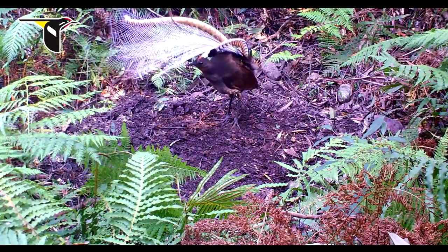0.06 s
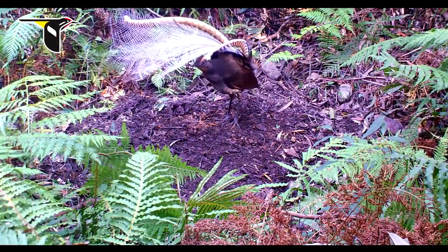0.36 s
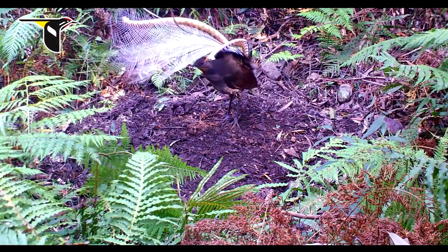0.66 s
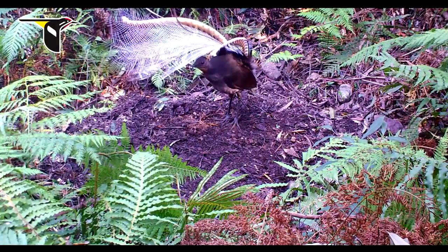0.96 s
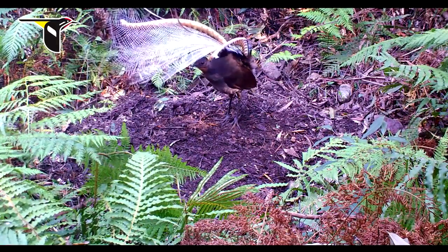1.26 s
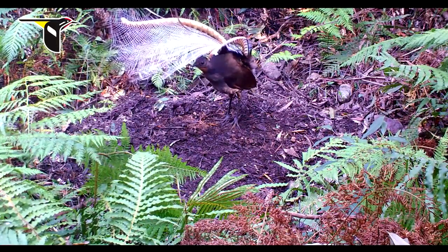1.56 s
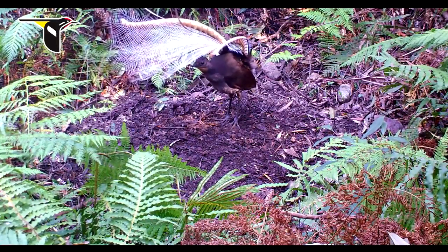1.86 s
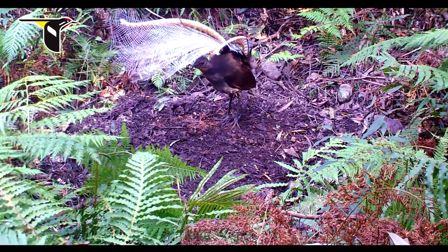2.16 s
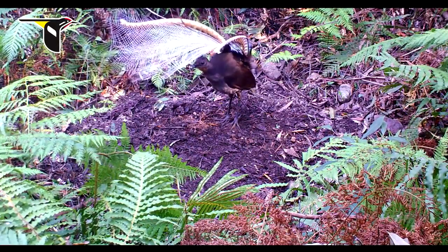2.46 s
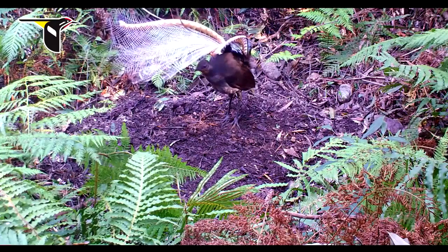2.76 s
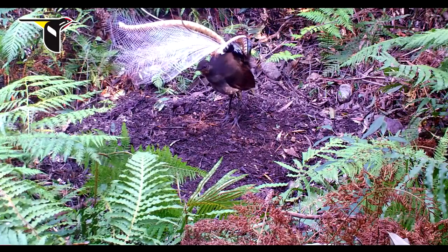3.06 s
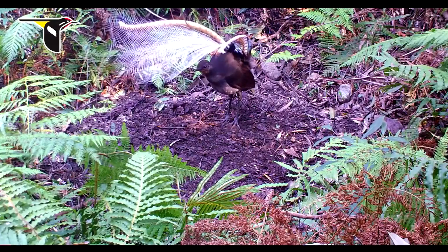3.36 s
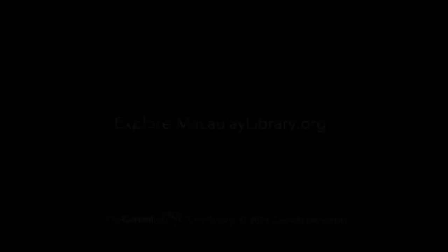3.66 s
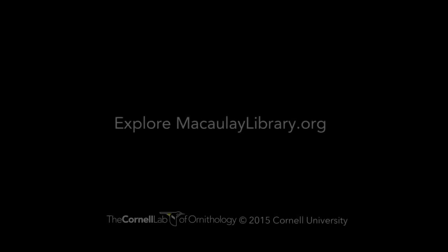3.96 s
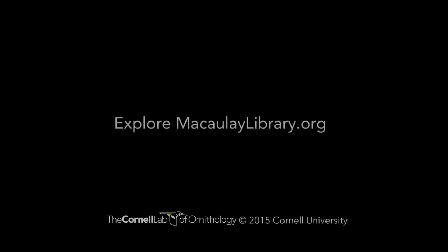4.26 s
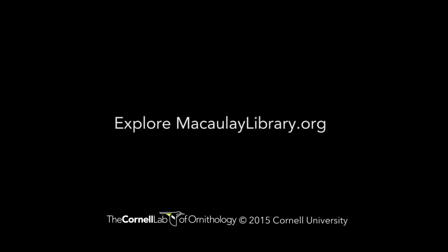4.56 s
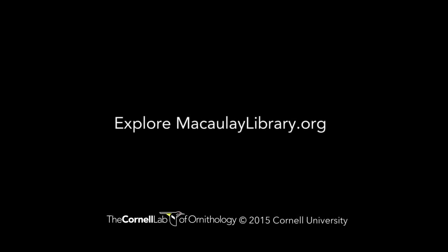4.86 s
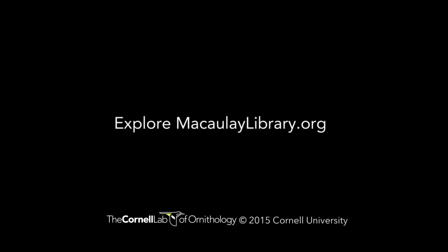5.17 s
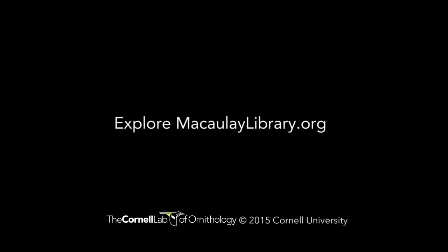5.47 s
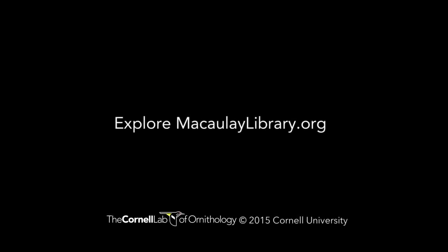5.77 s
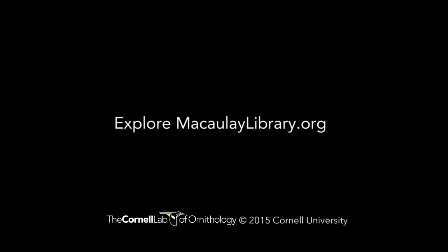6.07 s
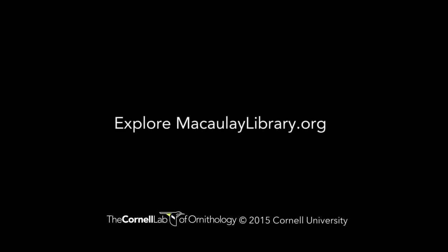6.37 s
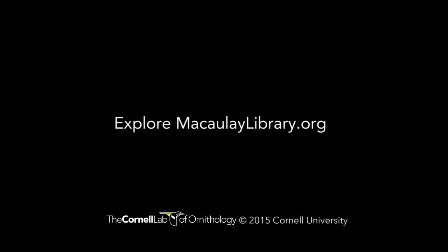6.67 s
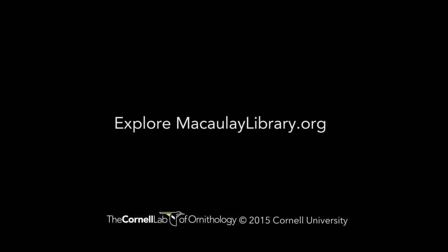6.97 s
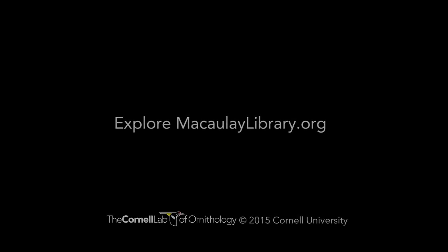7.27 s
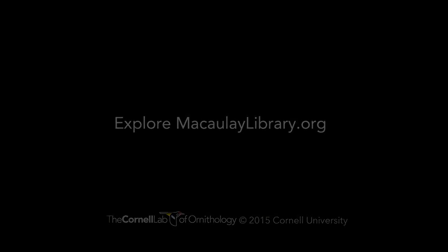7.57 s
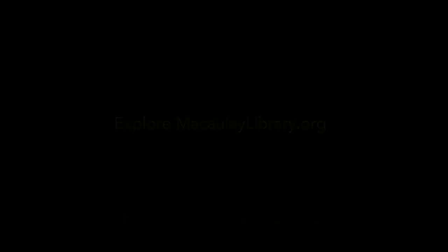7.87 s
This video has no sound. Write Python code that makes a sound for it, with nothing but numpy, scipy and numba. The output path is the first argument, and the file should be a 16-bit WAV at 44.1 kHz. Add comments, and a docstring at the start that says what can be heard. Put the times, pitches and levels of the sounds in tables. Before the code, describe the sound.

Over a faint insect buzz, a forest bird clicks and rasps rapidly, ending with two short squawks that each drop into a whistle.

```python
"""A lyrebird displays in a fern forest: short rattling chips, a train of longer rasps, then two harsh
squawks that each fall into a whistle. Its voice is a source and a filter: a membrane snaps unevenly
or locks into periodic vibration, and the resonances of the throat shape the spectrum.
Leaf litter crackles under its feet, insects buzz high over a low rumble of air,
and the ground and trunks return a thin echo."""
import sys
import numpy as np
from scipy import signal
from scipy.fft import rfft, irfft
from scipy.io import wavfile
from scipy.ndimage import uniform_filter1d
from numba import njit

SR = 44100
rng = np.random.default_rng(int(sys.argv[2]) if len(sys.argv) > 2 else 0)


def dump_mix(stems):
    """Bounce the given channels to the path in sys.argv[1] as a 16-bit WAV at rate SR."""
    frames = np.atleast_2d(stems).T  # one column per channel
    limited = np.clip(frames, -1, 1)  # hard clip at full scale
    pcm = np.round(limited * 32767).astype(np.int16)
    wavfile.write(sys.argv[1], SR, pcm)


N = 349272
T = np.arange(N) / SR

# chips: start t/s, peak t/s, 20 dB fall t/s, ring f/Hz, voicing (used from 0.25 up), relative level/dB
CHIPS = [(2.24, 2.265, .014, 4320, 0.1, -35), (2.345, 2.368, 0.017, 4720, 0, -36.5),
         (2.465, 2.488, 0.022, 4480, 0.39, -37), (2.59, 2.617, .014, 4540, 0.1, -33.5),
         (2.734, 2.755, .026, 4650, 0.1, -38.5), (3.323, 3.348, 0.026, 4210, 0.41, -38),
         (3.462, 3.486, 0.038, 4140, 0.43, -37), (3.601, 3.631, 0.039, 4050, .35, -38),
         (3.742, 3.774, 0.039, 4130, 0.36, -38.5), (4.315, 4.336, 0.017, 4500, 0.43, -31.5)]
# rasps: start t/s, end t/s, mid-sweep resonance f/Hz, relative level/dB, crescendo/dB
RASPS = [(3.517, 3.559, 4600, -56, -2), (3.662, 3.7, 4690, -52.5, 5), (3.808, 3.875, 4830, -44.5, 0),
         (3.929, 4.017, 4750, -44, 8.5), (4.085, 4.159, 4660, -42, 5), (4.23, 4.33, 4800, -43, -5),
         (4.398, 4.51, 4560, -39.5, 3.5), (4.579, 4.68, 4970, -41, 1), (4.762, 4.831, 4400, -40, 6.5),
         (4.903, 4.957, 4500, -51, -6), (4.968, 5.043, 4800, -38.5, -1), (5.111, 5.154, 4520, -54, -2),
         (5.161, 5.25, 4400, -39, 7.5), (5.299, 5.418, 4540, -39, 1.5), (5.423, 5.503, 4960, -43.5, -3),
         (5.529, 5.623, 4550, -38, 4), (5.69, 5.828, 4740, -38.5, 2), (5.88, 6.021, 4830, -41.5, 15.5),
         (6.115, 6.243, 4900, -41, 4.5), (6.346, 6.455, 5040, -42, 9.5), (6.458, 6.528, 4320, -57.5, 4)]
# side bands relative to each rasp: t/s, body level/dB, treble level/dB, sheen level/dB
RASP_BANDS = [(3.6, -21.5, -10, -13), (4.7, -18, -13.5, -23), (5.0, -21.5, -15, -21.5),
              (5.55, -22.5, -23, -25), (5.75, -48, -21, -21), (6.4, -49, -18.5, -15.5)]
# sudden pushes within the rasps: t/s, added level/dB
ACCENTS = [(4.661, 5.5), (5.004, 5.5), (5.192, 3)]
# squawks: start t/s, loudest t/s, end t/s, pitch when loudest f/Hz, level/dB
SQUAWKS = [(7.132, 7.176, 7.213, 972, -27.5), (7.307, 7.345, 7.39, 848, -37)]
# aperiodic share of a squawk's power: at its start, when loudest, at its end
SQUAWK_CHAOS = [.5, .28, .95]
# whistles: start t/s, end t/s, settled f/Hz, level/dB, decay/(dB/s), relative second harmonic level/dB
WHISTLES = [(7.196, 7.295, 1745, -21.5, 185.5, -21.5), (7.368, 7.453, 2115, -35, 77, -4)]
# upper harmonics of a whistle: harmonic number, relative level/dB
OVERTONES = [(3, -32.5), (5, -28.5), (6, -40), (7, -24.5), (8, -39)]

# pass bands of the chips and rasps: f/Hz, relative level/dB
CORE = [(2700, -27.5), (3050, -11), (3400, -10.5), (3650, -2.5), (3950, 0.5), (4400, 0), (4950, 0.5),
        (5300, -3), (5800, -3.5), (6100, -32), (6800, -45.5)]
BODY = [(450, -37), (750, 6.5), (1000, 2.5), (1250, 1.5), (1650, 6), (2300, -1), (2800, -16), (3600, 2)]  # low band of the chips, also of the litter
RASP_BODY = [(700, -19), (1150, -15), (1600, 6), (2200, 2.5), (2550, 6.5), (2850, -44), (3600, 7.5)]
TREBLE = [(5000, 2), (6200, 2), (6700, -4), (7500, 4), (7900, -12), (9200, -10.5), (12000, -32),
          (15000, -24.5)]
SHEEN = [(9300, -57), (9900, -4), (10400, 5.5), (11200, 8), (11600, -18.5), (13500, -19), (15000, -65)]
# formants of the open throat, and its crisp top band: f/Hz, relative level/dB
THROAT = [(560, -31.5), (720, -14), (880, -16.5), (1150, -16), (1750, -5.5), (2250, -2), (2570, -2),
          (2850, -18), (3250, -11), (3880, -1.5), (4350, -2.5), (4700, -16.5), (5150, -7.5), (5900, -19.5),
          (6800, -36)]
THROAT_TOP = [(6000, -21), (7700, -7), (8700, 2.5), (9700, 0), (11000, 4), (12500, -4), (15000, -10)]

# crackles underfoot: t/s, half width t/s, level/dB
CRACKLES = [(.368, 0.0053, -54), (0.527, 0.0087, -51.5), (.572, 0.024, -55.5), (.615, 0.022, -54),
            (.647, 0.0071, -37.5), (.675, .028, -57), (2.003, 0.0066, -54), (6.597, 0.018, -56),
            (6.661, 0.023, -59), (6.77, 0.095, -63.5), (7.839, 0.0039, -45)]
# spectrum of dry leaves: f/Hz, relative level/dB
LEAVES = [(2800, -25.5), (3500, -2.5), (4100, 11), (5000, 9), (6200, -4.5), (9000, -17.5), (11000, -8.5),
          (12500, -17), (15000, -21)]
# reflections from the ground and near trunks: delay t/s, level/dB relative to the direct sound
REFLECTIONS = [(.00085, -24.5), (.0037, -22.5), (.0066, -13), (0.011, -15.5)]
# envelope of the insect buzz: t/s, level/dB
BUZZ_LEVEL = [(0, -63), (.45, -64), (1.75, -62.5), (3.11, -70.5), (3.18, -83.5), (5.2, -64), (6.28, -71.5),
              (6.55, -65.5), (6.96, -65.5), (7.03, -76), (7.6, -102.5), (7.92, -62.5)]
# spectra of the insects and of still forest air: f/Hz, relative level/dB
BUZZ = [(3000, -18.5), (3600, -5.5), (4050, 4), (4700, 3.5), (5400, -1), (6200, -10.5), (7600, -17.5),
        (9300, -30.5), (11000, -16), (12500, -23.5), (15000, -34.5)]
FOREST_AIR = [(12, 1), (28, 1.5), (55, -4.5), (110, -8), (200, -14.5), (350, -20.5), (700, -28),
              (1400, -33.5), (2800, -41), (6000, -46), (10000, -48), (15000, -53)]


def chips():
    """Impulse excitation: a rattle rings the throat, whose resonance dips as an undertone arches up."""
    attack_s, body_db = .0057, -54
    notes, undertone, arches, ring, openings, crisp = [], 0, 0, 0, 0, 0
    waver = 1 + .012 * walk(500)
    for start, peak, fall, ring_hz, voicing, db in CHIPS:
        gate = ramp(T - start + attack_s / 2, attack_s)
        shape = gate * swell(peak, rise=.027, fall=fall, shape=1.65)
        envelope = undb(db) * shape
        arch = np.clip(1 - ((T - peak) / .028) ** 2, 0, 1)
        hz = ring_hz * (1 + .19 * (1 - arch ** 2))
        voicing = np.clip(voicing, .25, .9)
        noisy_db = 20 * np.log10(1 - voicing)  # voicing weakens the noise bands
        # the low body does not follow the chip's level; the upper bands do
        notes.append((envelope, hz, body_db - db + noisy_db, noisy_db - 22.5, noisy_db - 21))
        crisp += envelope * undb(noisy_db - 23.5)
        ring += envelope * voicing * np.sin(phase_of(hz * waver))
        undertone += shape * undb(body_db + .5) * np.sqrt(voicing)
        arches += arch
        # a thin, narrow-band rattle leads up to the peak
        openings += gate * ramp(peak - T, .011) * (voicing / .42) ** 2
    source, thin = (rattle(rate=800, jitter=.35, scatter_db=1.8, hiss=.6) for _ in range(2))
    hum = colour(pulses(270 + 68 * arches, rough=.008), BODY)
    thin = colour(resonance(thin, np.full(N, 4860.), width_hz=640.), CORE)
    main = undb(1.04) * (shape_notes(source, notes, sweep=.93, width_hz=1070., body=BODY) + ring)
    return main + undertone * hum + crisp * colour(source, THROAT_TOP) + undb(-44.5) * openings * thin


def rasps():
    """Modulation of a rattle: each beat of a flutter swings its level and sweeps the resonance upwards."""
    attack_s, release_s, flutter_hz = .0054, .004, 68
    band_times, *bands = np.transpose(RASP_BANDS)
    notes, crisp = [], 0
    for start, end, ring_hz, db, crescendo_db in RASPS:
        gate = np.clip(np.minimum((T - start) / attack_s, (end - T) / release_s) + .6, 0, 1)
        place = ramp(T - start, end - start) - .5
        arch_db = -6 * (2 * place) ** 2
        envelope = gate * undb(db + crescendo_db * place + arch_db)
        body_db, treble_db, sheen_db = (np.interp((start + end) / 2, band_times, b) for b in bands)
        notes.append((envelope, ring_hz, body_db, treble_db, sheen_db))
        crisp += envelope * undb(sheen_db - 11)
    beats = np.cumsum(flutter_hz * (1 + .06 * walk(25))) / SR
    depth = np.interp(T, [4.6, 5.6], [.45, 1])  # the flutter deepens along the train
    source = rattle(rate=760, jitter=.3, scatter_db=1.1, hiss=.6)
    source *= undb(1.4 * depth * np.sin(2 * np.pi * beats))
    sweep = 1 + .36 * depth * (beats % 1 - .45) + .04 * walk(90)
    accent_db = sum(db * np.exp(-((T - s) / .009) ** 2) for s, db in ACCENTS)
    main = shape_notes(source, notes, sweep, width_hz=1060., body=RASP_BODY)
    return undb(.83 + accent_db) * (main + crisp * colour(source, THROAT_TOP))


def squawk(start, loudest, end, loudest_hz, db):
    """Nonlinear vibration: a rising tone, partly broken into chaos, excites the open throat's formants."""
    start_hz, attack_s, release_s = 696, .0027, .009
    chaos = rattle(rate=1300, jitter=.35, scatter_db=1.5, hiss=.7)
    climb = np.clip((T - start) / (loudest - start), 0, 1.3)
    tone = pulses(start_hz + (loudest_hz - start_hz) * climb, rough=.024)
    stages = [start, loudest, end]
    share = np.interp(T, stages, SQUAWK_CHAOS)
    gate = ramp(T - start, attack_s) * ramp(end - T, release_s)
    envelope = gate * undb(db + np.interp(T, stages, [-15, 0, -9.5]))
    throat = np.sqrt(1 - share) * colour(tone, THROAT) + np.sqrt(share) * colour(chaos, THROAT)
    return (throat + undb(-19) * colour(chaos, THROAT_TOP)) * envelope


def whistle(start, end, settled_hz, db, fade_db_per_s, second_db):
    """Periodic oscillation: the membrane locks into a clear tone that swoops down, sags and settles."""
    swoop_hz, sag_hz = 2530, 94.8
    attack_s, swell_s, release_s = .0033, .018, .016
    age = np.clip(T - start, 0, end - start)
    swoop = np.exp(-(age / .009) ** 2)
    sag = np.exp(-((age - .03) / .015) ** 2)
    grown = ramp(age, swell_s)
    hz = (settled_hz + (swoop_hz - settled_hz) * swoop) * (1 + .00206 * walk(300))
    phase = phase_of(hz - sag_hz * sag)
    upper_phase = phase_of(hz - .25 * sag_hz * sag)  # the overtones hardly sag
    second = undb(second_db * (1 - swoop) - 12 * swoop - 9.5 * sag)
    tone = np.sin(phase) + second * np.sin(2 * phase)
    drive = undb(.7 * (db + 22))  # a note driven harder is brighter
    for harmonic, overtone_db in OVERTONES:
        tone += drive * grown ** 2 * undb(overtone_db) * np.sin(harmonic * upper_phase)
    gate = ramp(age, attack_s) * ramp(end - T, release_s)
    level_db = db - 8 * (1 - grown) - fade_db_per_s * np.maximum(age - swell_s, 0)
    hiss = undb(-56.5) * colour(rng.standard_normal(N), THROAT)
    return gate * (np.sqrt(2) * tone * undb(level_db + .5 * walk(180)) + hiss)


def peep(middle_s=2.558, half_s=.021, top_hz=3400, db=-61.5):
    """Frequency modulation: one faint pure tone arches up and down between the chips."""
    hz = top_hz - 350 * np.minimum(((T - middle_s) / half_s) ** 2, 2)
    envelope = undb(db) * swell(middle_s, half_s, half_s, shape=4)
    return envelope * np.sqrt(2) * np.sin(phase_of(hz))


def rattle(rate, jitter, scatter_db, hiss):
    """Aperiodic excitation: uneven snaps, about rate a second, each with a decaying puff of turbulence."""
    chance = rng.standard_normal((N // 8, 2))
    at = np.cumsum(SR / rate * np.exp(jitter * chance[:, 0])).astype(int)
    snaps = np.bincount(at[at < N], undb(scatter_db * chance[at < N, 1]), N)
    puffs = signal.lfilter([1], [1, -np.exp(-rate / SR)], snaps) * rng.standard_normal(N)
    return unit(unit(snaps) + hiss * unit(puffs))


def pulses(hz, rough):
    """Periodic excitation: nine equal harmonics of a trembling fundamental add up to a pulse train."""
    phase = phase_of(hz * (1 + rough * walk(400)))
    return unit(sum(np.cos(k * phase) for k in range(1, 10)))


def shape_notes(source, notes, sweep, width_hz, body):
    """Source-filter principle: a moving throat resonance with fixed body and treble bands shapes each note.
    Apart from that, a thin high sheen near 11 kHz sounds along with each note."""
    envelopes, pitches, *band_levels = zip(*notes)
    envelope = sum(envelopes)
    ring_hz = sum(e * hz for e, hz in zip(envelopes, pitches)) / np.maximum(envelope, 1e-12)
    centre_hz = np.clip(np.where(envelope > 1e-9, ring_hz, 4500) * sweep, 3000, 7000)
    out = colour(resonance(source, centre_hz, width_hz), CORE) * envelope
    for band, levels in zip((body, TREBLE, SHEEN), band_levels):
        out += colour(source, band) * sum(e * undb(db) for e, db in zip(envelopes, levels))
    return out


@njit
def resonance(x, hz, width_hz):
    """Damped resonator: a state-variable band-pass with gain 1 at its moving centre."""
    out, band_state, low_state = np.empty(len(x)), 0., 0.
    for i in range(len(x)):
        tuning, damping = np.tan(np.pi * hz[i] / SR), width_hz / hz[i]
        band = (band_state + tuning * (x[i] - low_state)) / (1 + tuning * (tuning + damping))
        band_state = 2 * band - band_state
        low_state += 2 * tuning * band
        out[i] = damping * band
    return out


def leaf_litter():
    """Impulsive noise: dry leaves and twigs crackle underfoot; longer scuffs have more low body."""
    grains = rattle(rate=2000, jitter=.5, scatter_db=2.2, hiss=.5)
    crisp, dull = colour(grains, LEAVES), colour(grains, BODY)
    out = 0
    for s, half_s, db in CRACKLES:
        body_db = -12.5 + 1.5 * np.log2(half_s / .01)
        out += undb(db) * swell(s, half_s, half_s, shape=3) * (crisp + undb(body_db) * dull)
    return out


def early_reflections(x):
    """Interference: delayed copies from the ground and near trunks comb-filter the direct sound."""
    out = x + sum(undb(db) * np.interp(T - delay, T, x) for delay, db in REFLECTIONS)
    return out / np.sqrt(1 + sum(undb(db) ** 2 for _, db in REFLECTIONS))


def trunk_echo(x, t60, treble_hz, db):
    """Scattering: the trees return late, dull echoes that decay exponentially."""
    t = T[:SR]
    echoes = rng.standard_normal(SR) * undb(-60 * t / t60) * ramp(t - .008, .0075)
    echoes /= np.sqrt(np.sum(echoes ** 2))
    echoes = signal.sosfilt(signal.butter(1, treble_hz, fs=SR, output="sos"), echoes)
    return undb(db) * signal.fftconvolve(x, echoes)[:N]


def insects():
    """Fusion of impulses: clicks too dense to hear singly merge into a high, grainy buzz."""
    grains = rattle(rate=2200, jitter=.6, scatter_db=2.2, hiss=.7)
    flicker = undb(.9 * walk(45))
    return colour(grains, BUZZ) * flicker * undb(np.interp(T, *np.transpose(BUZZ_LEVEL)))


def forest_air():
    """Broadband noise: the air's power lies at low frequencies and is heard as a rumble."""
    return undb(-54) * colour(rng.standard_normal(N), FOREST_AIR)


def colour(x, points):
    """Minimum-phase filtering through (f/Hz, level/dB) points; the result has rms 1."""
    hz, db = np.transpose(points)
    f = np.maximum(np.fft.rfftfreq(N, 1 / SR), 1)
    octaves_outside = np.maximum(np.log2(hz[0] / f), 0) + np.maximum(np.log2(f / hz[-1]), 0)
    gain_db = np.interp(np.log(f), np.log(hz), db) - 20 * octaves_outside
    cepstrum = irfft(np.log(undb(np.maximum(gain_db, -90))), N)
    cepstrum[1:N // 2] *= 2  # folding the cepstrum makes the filter causal
    cepstrum[N // 2 + 1:] = 0
    return unit(irfft(rfft(x) * np.exp(rfft(cepstrum)), N))


def swell(peak_s, rise, fall, shape):
    """Burst envelope, 20 dB down at rise seconds before and fall seconds after its peak."""
    away = np.maximum((peak_s - T) / rise, (T - peak_s) / fall)
    out, near = np.zeros(N), away < 4
    out[near] = undb(-20 * away[near] ** shape)
    return out


def walk(rate):
    """Smooth random fluctuation with rms 1 and rate new values a second."""
    step = int(SR / rate)
    held = np.repeat(rng.standard_normal(N // step + 1), step)[:N]
    return unit(uniform_filter1d(held, step))


def ramp(seconds, length_s):
    """Linear rise from 0 to 1 over length_s."""
    return np.clip(seconds / length_s, 0, 1)


def phase_of(hz):
    """Phase in radians is the time integral of angular frequency."""
    return 2 * np.pi * np.cumsum(hz) / SR


def undb(db):
    """Decibels to amplitude ratio."""
    return 10 ** (np.asarray(db) / 20)


def unit(x):
    """Normalisation to rms 1."""
    return x / np.sqrt(np.mean(x ** 2))


def scene():
    """Superposition: the bird, its echoes, the insects and the air add linearly."""
    clicking = early_reflections(chips() + rasps() + peep() + leaf_litter())
    calls = early_reflections(sum(squawk(*row) for row in SQUAWKS))
    calls += sum(whistle(*row) for row in WHISTLES)
    echo = trunk_echo(clicking, t60=.31, treble_hz=4900, db=-20.5)
    echo += trunk_echo(calls, t60=.69, treble_hz=2950, db=-19)  # loud calls carry further into the trees
    air = forest_air()
    return (clicking + calls + echo + insects() + air)[None]


def record(dry):
    """Band limiting: a steep elliptic low-pass removes the highest treble."""
    return signal.sosfilt(signal.ellip(10, .2, 70, 14950, fs=SR, output="sos"), dry)


dry = scene()
out = record(dry)
dump_mix(out)
```